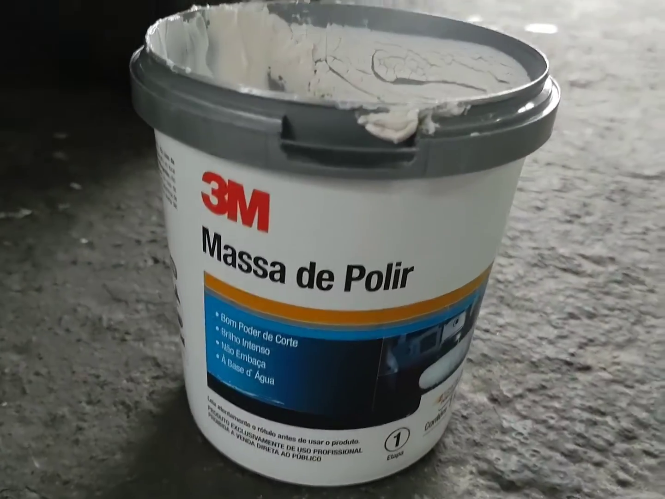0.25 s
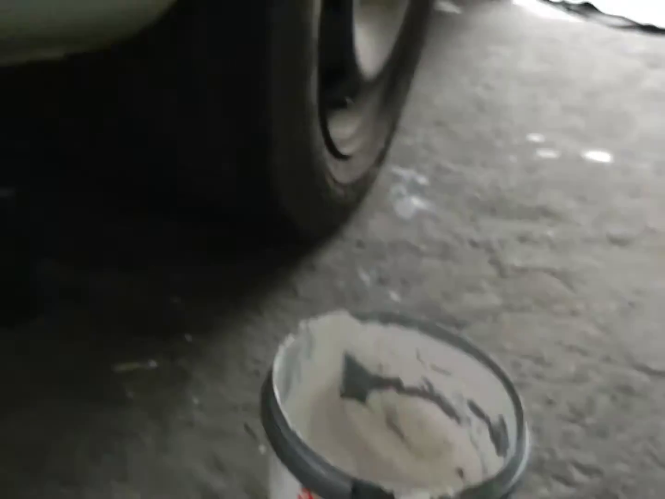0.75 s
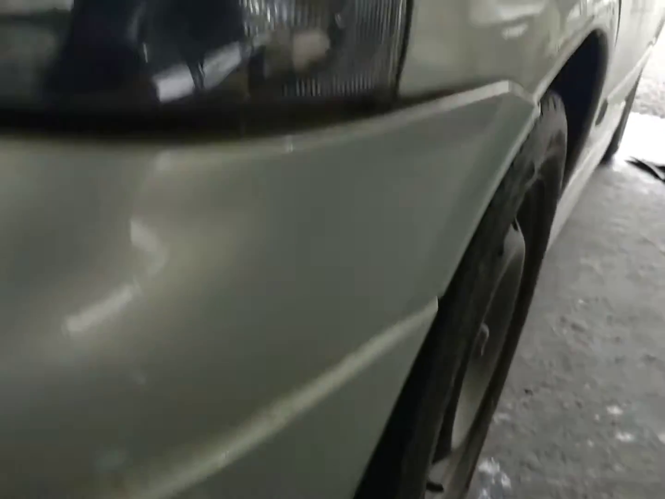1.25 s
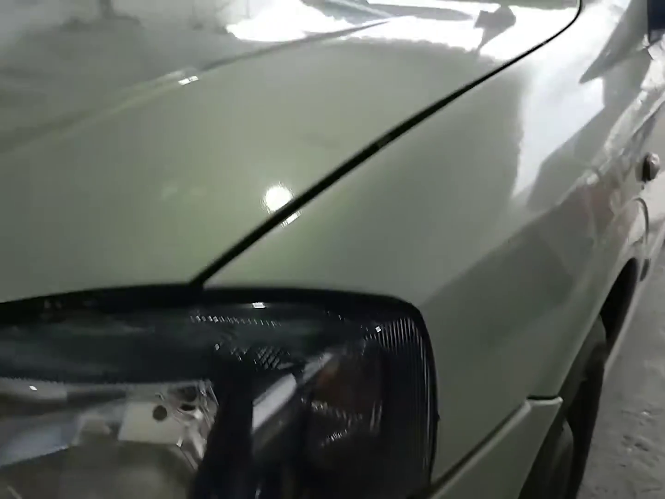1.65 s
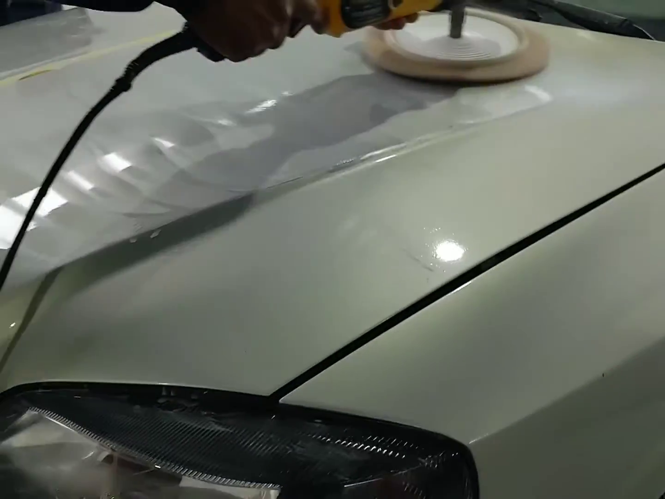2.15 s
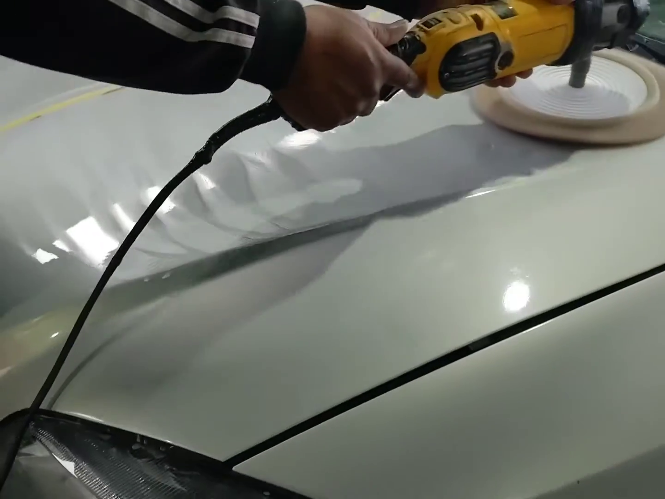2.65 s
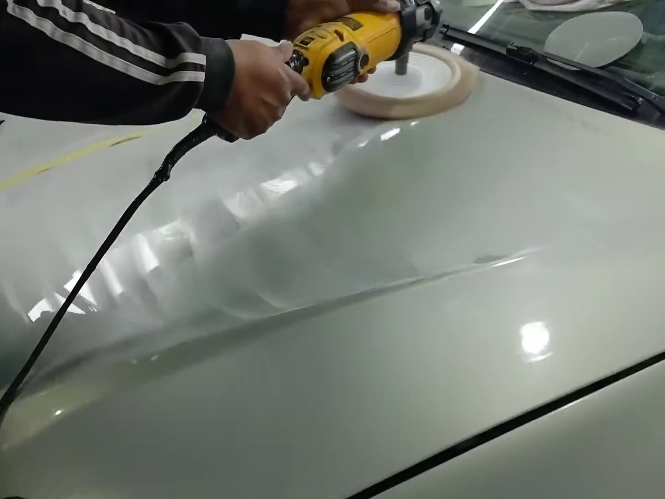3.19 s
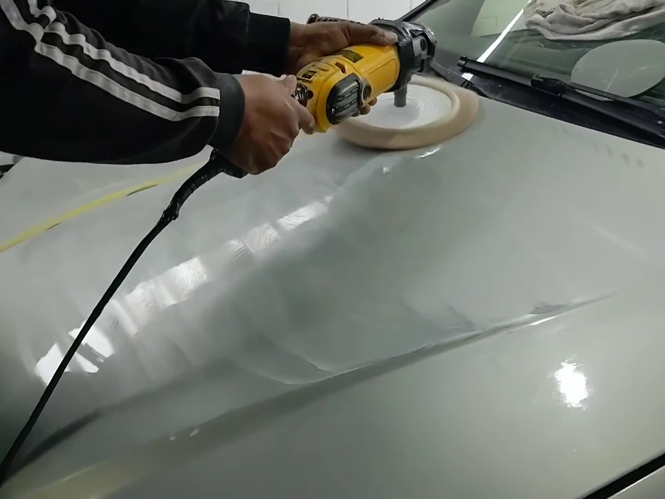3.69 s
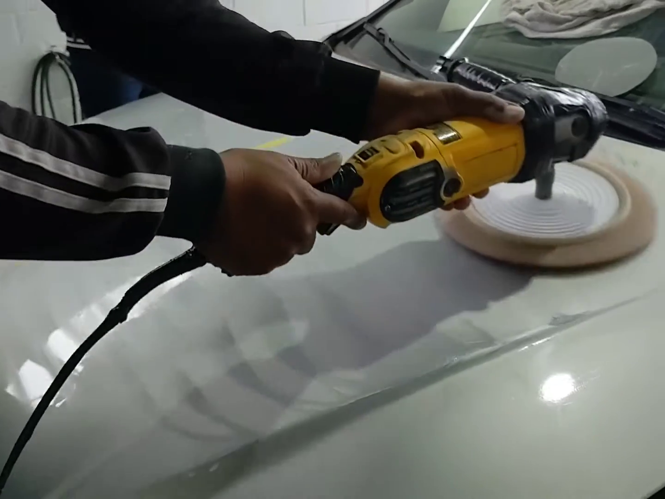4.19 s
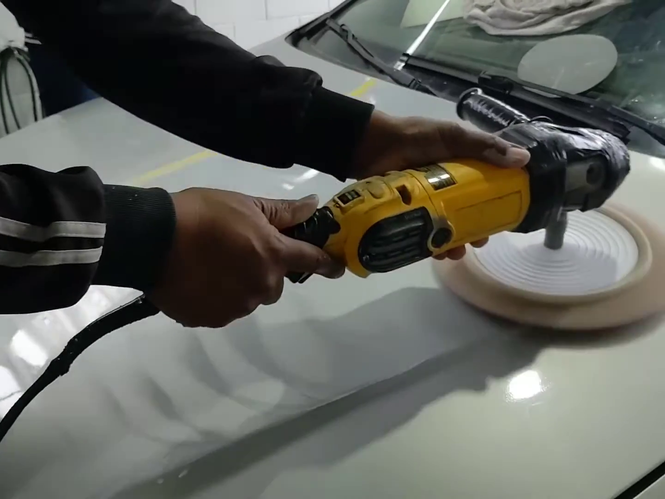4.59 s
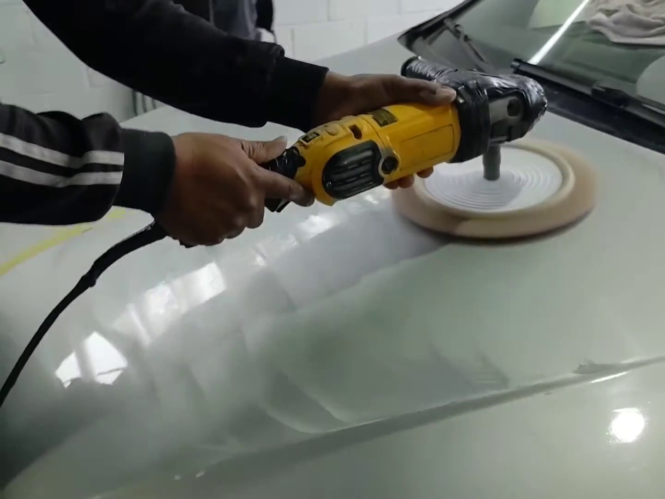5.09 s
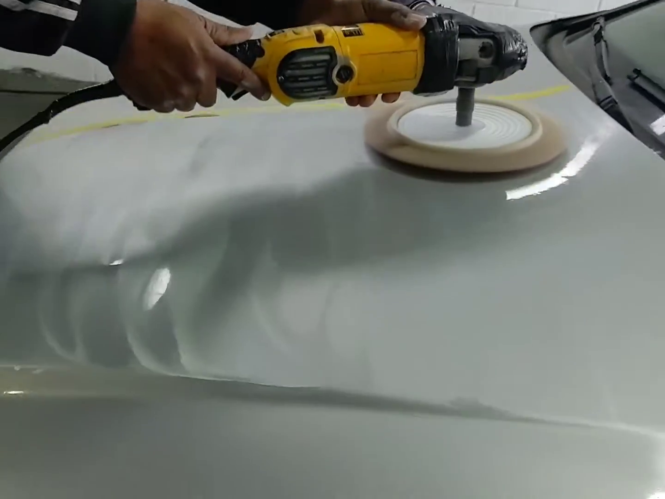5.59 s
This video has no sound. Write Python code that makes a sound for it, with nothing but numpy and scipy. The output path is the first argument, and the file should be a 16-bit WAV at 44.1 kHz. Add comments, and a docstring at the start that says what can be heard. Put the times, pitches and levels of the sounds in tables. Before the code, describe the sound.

Continuous high motor whine of a rotary buffer on a car bonnet, growing from dull to sharp and near over low workshop hum.

```python
"""Rotary polisher on a car bonnet

An electric polisher buffs a bonnet in a garage; a phone is carried round the wing and up to the tool.
The armature turns about 260 times a second: its harmonics sing from gears, commutator and cooling fan.
Gear chatter repeats with every pad turn, air hisses from the vents, the pad rubs the paint and makes the
bonnet growl; a low tone rings, later one soft thud falls, over a low workshop hum."""
import sys
import numpy as np
from scipy import signal
from scipy.fft import rfft, irfft, next_fast_len
from scipy.io import wavfile
from scipy.ndimage import uniform_filter1d

SR = 44100
rng = np.random.default_rng(int(sys.argv[2]) if len(sys.argv) > 2 else 0)


def file_out(sig):
    """Save sig as 16-bit WAV at sys.argv[1]."""
    # one column per channel
    cols = np.atleast_2d(sig).T
    # limit, then scale
    lim = np.clip(cols, -1, 1)
    pcm = np.round(lim * 32767).astype(np.int16)
    wavfile.write(sys.argv[1], SR, pcm)


N = 257347
T = np.arange(N) / SR
BINS_HZ = np.fft.rfftfreq(N, 1 / SR) + 1e-3  # offset keeps the logarithm finite

# mean armature speed, drifting up and down: t/s, f/Hz
SPEED = [(0.0, 257.8), (0.08, 256.8), (0.41, 258.7), (0.52, 263.2), (0.76, 258.2), (0.88, 259.8),
         (1.1, 261.8), (1.4, 254.7), (1.74, 255.3), (1.87, 258.9), (2.01, 260.8), (2.39, 259.1),
         (2.71, 258.2), (2.89, 254.9), (3.23, 257.3), (3.7, 262.2), (3.8, 264.3), (4.24, 267.8),
         (4.49, 261.8), (4.68, 264.7), (4.88, 256.8), (5.3, 257.7), (5.59, 252.7), (5.72, 253.4),
         (5.84, 256.3)]
# gear mesh tone, before trim: t/s, level/dB
GEAR_MESH = [(0.0, -39.5), (0.42, -50), (0.47, -34), (1.15, -44), (1.23, -34), (1.33, -49), (1.93, -29),
             (2.53, -21), (2.65, -32), (3.22, -21), (3.61, -30.5), (3.85, -27), (3.93, -37), (4.13, -26),
             (4.19, -33.5), (5.2, -28.5), (5.35, -37), (5.84, -27)]
# fan whine, the leading voice, before trim: t/s, level/dB, left minus right/dB
FAN = [(0.0, -27, 9.0), (0.05, -29.5, 6), (1.02, -29, 6.5), (1.12, -29.5, 4), (1.61, -16.5, 4.5),
       (2.05, -31, 9), (2.08, -25.5, 19), (2.36, -23.5, 9.5), (2.39, -17.5, 9.5), (3.02, -25, 9.5),
       (3.3, -19.5, 13), (3.41, -24.5, 6.5), (4.14, -26.5, 6.5), (4.68, -15.5, 4.5), (4.88, -23, 2.5),
       (5.61, -21, 1), (5.74, -20.5, 11), (5.84, -22, 2)]
# whine just below the gear mesh, before trim: t/s, level/dB
LOW_WHINE = [(0.0, -58), (1.71, -45.5), (2.24, -31), (2.68, -37), (4.09, -22.5), (5.69, -50.5), (5.84, -48)]
# thin whistle above the fan, before trim: t/s, level/dB
WHISTLE = [(0.0, -40), (1.92, -33.5), (2.1, -23.5), (2.32, -32), (2.76, -21), (3.69, -35), (4.13, -25),
           (4.94, -29.5), (5.04, -22.5), (5.32, -20), (5.36, -25.5), (5.84, -18.5)]
# armature harmonics, relative within a run: multiple of speed, level behind tool/dB, level beside it/dB
HARMONICS = [(6, -34, -28), (7, -26, -15), (8, -33, -19.5), (9, -47, -12), (10, -26, -40), (11, -44.5, -13),
             (12, -37.5, -12), (13, -34, -15.5), (14, -42, -25.5), (15, -33.5, -42), (16, -27, -29.5),
             (17, -22.5, -22.5), (18, -32.5, -29), (19, -35, -26), (20, -42.5, -37), (22, -39, -40.5),
             (23, -59, -56), (24, -38.5, -24.5), (25, -77, -21), (26, -34, -19), (27, -45, -29),
             (28, -27.5, -20), (29, -81, -40), (30, -51.5, -33), (31, -29, -35), (32, -50, -37.5),
             (33, -46, -21), (34, -37, -67), (35, -41, -34), (36, -33.5, -25.5), (37, -35, -31),
             (38, -45, -55), (40, -46, -30.5), (42, -32, -35.5), (43, -67, -66), (44, -57, -56),
             (45, -64, -66), (46, -44, -35), (47, -59, -54), (48, -74, -51)]
# peaks and dips of the motor housing: f/Hz, width/Hz, gain/dB
HOUSING = [(2330, 50, 4), (3190, 55, 10), (4520, 60, -5), (4840, 35, -5), (5020, 60, 5), (5320, 100, -10)]
# gear case resonances: f/Hz, width/Hz, relative level/dB
GEAR_CASE = [(1677, 39, -4.5), (1811, 15, -15.5), (2151, 19, 7), (2426, 193, 0.5), (3050, 240, -1.5)]
# main air vents: f/Hz, width/Hz, relative level/dB
VENTS = [(1770, 450, 1.5), (2620, 520, -5), (3270, 490, -1.5), (4405, 860, -.5), (5310, 340, -17)]
# higher-pitched air slots: f/Hz, width/Hz, relative level/dB
SLOTS = [(5550, 400, -15), (6290, 600, -4), (7200, 660, -5), (8190, 350, -2.5), (9380, 160, -2.5)]
# spectrum of the finest hiss: f/Hz, relative density/(dB per Hz)
SPRAY = [(7000, 8), (9400, -11), (10400, 8), (11300, 0), (11900, 7), (13000, -10), (14200, -2.5),
         (15100, 3), (16000, -4)]
# spectrum of the pad's rub: f/Hz, relative density/(dB per Hz)
PAD_RUB = [(150, -47), (350, -2), (500, -1.5), (620, -0.5), (760, 2), (900, -0.5), (1050, -13),
           (1400, -31.5), (3500, -17)]
# pad pressure as bonnet growl, before trim: t/s, level/dB
PRESSURE = [(0.0, -40.5), (1.15, -43), (1.64, -34.5), (3.01, -33.5), (3.49, -29), (3.93, -28.5),
            (4.26, -41), (5.48, -42.5), (5.79, -36.5), (5.84, -43)]
# bonnet resonances: f/Hz, width/Hz, relative level/dB
BONNET = [(920, 65, 0.5), (945, 370, 0), (1087, 230, 4.5), (1230, 53, 2)]
# a low ringing tone, then three partials of one soft thud: t/s, initial decay level/dB, f/Hz, t60/s
RING_AND_THUD = [(1.213, -32, 220.5, 0.81), (3.393, -29, 90, 0.14), (3.398, -22, 170, 0.073),
                 (3.4, -31, 306, 0.2)]
# spectrum of the workshop rumble: f/Hz, relative density/(dB per Hz)
RUMBLE = [(28, -29), (45, -20), (65, -8.5), (90, -7), (125, -5.5), (160, 0.5), (200, -5), (245, -1.5),
          (300, -10.5), (375, -5.5), (470, -13)]
# swells of the low hum: t/s, 1/e half length/s, mains hum rise/dB, imbalance rise/dB
HUM_SWELLS = [(0.268, 0.19, 11, 14), (0.69, .16, 8, 6.5), (5.546, .22, 9, 3)]
# phone path: t/s, distance/m, side (0 behind tool, 1 beside), shadow (0 open, 1 deep behind car)
PHONE_PATH = [(0, 3.7, 0.22, 1), (1.15, 2.5, 0, 0.82), (1.45, 1.44, 0.43, 0.28), (1.95, 0.88, 0.37, 0.42),
              (2.4, 1.08, 0.19, 0.09), (2.8, 0.88, 0.36, 0.092), (3.3, 1.13, 0.017, 0),
              (3.82, .95, 0.21, 0.12), (4.06, 0.55, 0.88, 0.11), (4.6, 0.64, .95, 0.034),
              (5.05, 0.73, 1, 0.023), (5.84, 0.6, 0.84, 0.15)]
# output by part: behind at 1 m/dB, beside at 1 m/dB, via room/dB, direct loss in car's shadow/dB,
# left minus right/dB from behind, from beside, from room
RADIATION = {"case": (-47, -23, -37.5, 19, 23, -9.5, -13),
             "commutator": (-27, -22.5, -36.5, 2, -1.5, -7.5, 3),
             "brushes": (-26.5, -32, -49.5, 34, -0.5, 1.5, 18),
             "rattle": (-34, -24.5, -49.5, -3.5, -6.5, -10.5, 3),
             "vents": (-23, -29.5, -33.5, 13, -1, -2, 3), "slots": (-34.5, -36, -36, 10.5, 10, 26, -3),
             "spray": (-32, -33.5, -47.5, 23, 2, 6, 2.5), "rub": (-34, -42.5, -45, 9, -1, 0.5, 1)}

GEAR_RATIO = 62 / 7  # armature turns per pad turn
FREE_HZ, LOAD_SAG_HZ = 269.9, 15.6  # speed without load; sag at full load
RIPPLE_HZ = 120  # mains pulsation
SHADE_DB_PER_OCT = 25  # treble slope deep behind the car
OPEN_ECHO, HIDDEN_ECHO = 0.18, 1  # reflected share of the harmonics, tool in sight and hidden
RUMBLE_DB, HUM_DB, IMBALANCE_DB = -41, -46.5, -50.5  # before swells and drift
TOP_HZ = 15900


def motor(turns):
    """Harmonics grouped by pinion (7 teeth), commutator (12 bars), fan blades and neighbouring whines."""
    low = sing(turns, 6, 6, flutter_hz=20, wobble=0.28, ripple=0)
    mesh = sing(turns, 7, 7, flutter_hz=12, wobble=0.2, ripple=0)
    case = sing(turns, 8, 10, flutter_hz=16, wobble=0.39, ripple=0)
    bars = sing(turns, 11, 14, flutter_hz=14, wobble=0.13, ripple=0.8)
    blades = sing(turns, 15, 21, flutter_hz=30, wobble=0.11, ripple=0)
    whistle = sing(turns, 22, 33, flutter_hz=24, wobble=0.17, ripple=0.5)
    brushes = sing(turns, 34, 48, flutter_hz=32, wobble=0.22, ripple=1.5)
    fan_db, fan_pan_db = curves(FAN)
    tones = place(low, curves(LOW_WHINE)[0] + 0.85, pan_db=-0.5)
    tones += place(mesh, curves(GEAR_MESH)[0] + 3.4, pan_db=-2.1)
    tones += place(blades, fan_db + 3.5, fan_pan_db + 0.2)
    tones += place(whistle, curves(WHISTLE)[0] + 1.47, pan_db=4)
    return tones + heard(case, "case") + heard(bars, "commutator") + heard(brushes, "brushes")


def sing(turns, first, last, flutter_hz, wobble, ripple):
    """A run of armature harmonics, each reaching the ears directly and by shifting reflections."""
    beside, reflected, shade_db = outlook()
    direct, echo = np.sqrt(1 - reflected), np.sqrt(reflected / 2)
    speed_hz = curves(SPEED)[0]
    load = np.clip((FREE_HZ - speed_hz) / LOAD_SAG_HZ, 0, 2)
    out = np.zeros((2, N))
    for k, behind_db, beside_db in HARMONICS:
        if not first <= k <= last:
            continue
        angle = 2 * np.pi * ((k * turns + rng.random()) % 1)
        level_db = behind_db + beside * (beside_db - behind_db)
        size = undb(level_db - shade_db * max(np.log2(k / 26), 0))
        size = size * housing(k * speed_hz)
        size = size * (1 + wobble * per_turn(turns / GEAR_RATIO, count=5))  # uneven wheel teeth
        if k % 12 == 0:
            # brush current pulses with the mains, more under load
            size = size * (1 + ripple * load * np.cos(2 * np.pi * RIPPLE_HZ * T))
        sine, cosine = size * np.sin(angle), size * np.cos(angle)
        lag_rad = 1.07 * walk(1.177)  # drifting phase between the ears
        together, apart = direct * np.cos(lag_rad), direct * np.sin(lag_rad)
        for ear, side in enumerate((1, -1)):
            out[ear] += sine * (together + echo * walk(flutter_hz))
            out[ear] += cosine * (side * apart + echo * walk(flutter_hz))
    # harmonics trade strength while the run's short-term level stays even
    return out / np.sqrt(uniform_filter1d(out ** 2, size=5000, axis=1))


def housing(hz):
    """Housing gain at a tone's pitch; harmonics slide through its peaks and dips with speed."""
    return undb(sum(db * np.exp(-((hz - centre) / width) ** 2) for centre, width, db in HOUSING))


def rattle(turns):
    """Wheel teeth chatter in the resonant gear case: a pattern repeated each pad turn, plus noise."""
    teeth = np.array([per_turn(turns / GEAR_RATIO, count=600) for ear in range(2)])
    loose = noise(0.14) * (1 + 0.087 * np.cos(2 * np.pi * turns))
    chatter = teeth + 1.1 * loose
    return heard(shape(chatter, resonances(GEAR_CASE)), "rattle")


def air(turns):
    """Cooling air, chopped by the fan, hisses through vents and slots, with a finer spray of hiss."""
    chop = 1 + 0.29 * np.cos(2 * np.pi * turns) + 0.36 * np.cos(4 * np.pi * turns)
    spray = shape(noise(0) * chop, colour(SPRAY))
    return (heard(blow(VENTS, chop), "vents") + heard(blow(SLOTS, chop), "slots")
            + heard(spray, "spray"))


def blow(openings, chop):
    """Resonant bands of chopped noise, each flickering on its own and shaded above 6 kHz."""
    shade_db = outlook()[2]
    out = 0
    for hz, width_hz, db in openings:
        flicker_db = 1.5 * walk(20.63) - shade_db * max(np.log2(hz / 6000), 0)
        band = shape(noise(0.055) * chop, resonances([(hz, width_hz, 0)]))
        out = out + band * np.sqrt(width_hz) * undb(db + flicker_db)
    return unit(out)


def pad(turns):
    """The pad drags over the paint, gripping unevenly round its rim; pressed, it makes the bonnet growl."""
    growl_db = curves(PRESSURE)[0]
    pressure = undb(growl_db - growl_db.max())
    grip = undb(1.6 * per_turn(turns / GEAR_RATIO, count=7))
    scuffs = per_turn(turns / GEAR_RATIO, count=400)  # same tufts catch on every turn
    rub = shape(noise(1.0) * grip + 0.22 * scuffs, colour(PAD_RUB))
    drive = noise(0.17) * grip * np.sqrt(1 - pressure / 2) + pressure ** 2 * scuffs / 2
    growl = shape(drive, resonances(BONNET))
    shake = pressure * grip * np.sin(2 * np.pi * 4 * turns)  # fourth armature harmonic in the bonnet
    return heard(rub, "rub") + (growl + 0.71 * shake) * undb(growl_db - 2.5)


def ring_and_thud():
    """A low 220 Hz ringing tone, then one soft thud of three partials: decaying sines, 1.3 ms attack."""
    out = np.zeros(N)
    for s, db, hz, t60_s in RING_AND_THUD:
        age_s = np.maximum(T - s, 0)
        envelope = undb(db - 60 * age_s / t60_s) * (1 - np.exp(-age_s / 0.0013))
        out += envelope * np.sin(2 * np.pi * hz * age_s)
    return out


def drone(turns):
    """Workshop rumble as coloured noise, with swelling mains hum and armature imbalance."""
    hum_db, shaft_db = HUM_DB, IMBALANCE_DB
    for s, half_length_s, hum_rise_db, shaft_rise_db in HUM_SWELLS:
        swell = np.exp(-((T - s) / half_length_s) ** 2)
        hum_db = hum_db + hum_rise_db * swell
        shaft_db = shaft_db + shaft_rise_db * swell
    hum = undb(hum_db + 2.8 * walk(9)) * np.sin(2 * np.pi * RIPPLE_HZ * T + 0.5 * walk(5.0))
    shaft = undb(shaft_db) * np.sin(2 * np.pi * turns + 0.29 * walk(4.6))
    rumble = shape(noise(1.0), colour(RUMBLE)) * undb(RUMBLE_DB)
    return rumble + hum + shaft


def outlook():
    """Side heard (the room blends both when hidden), reflected share, treble shade in dB per octave."""
    _, beside, hidden = curves(PHONE_PATH)
    beside, hidden = np.clip([beside, hidden], 0, 1)
    reflected = np.clip(OPEN_ECHO + (HIDDEN_ECHO - OPEN_ECHO) * hidden ** 2, 0, 1)
    return beside + hidden ** 2 * (0.5 - beside), reflected, SHADE_DB_PER_OCT * hidden


def heard(x, part):
    """Direct level follows side, distance and the car's shadow; the room's share stays constant."""
    behind_db, beside_db, room_db, shadow_db, behind_pan_db, beside_pan_db, room_pan_db = RADIATION[part]
    metres, beside, hidden = curves(PHONE_PATH)
    direct = undb(behind_db + beside * (beside_db - behind_db) - hidden * shadow_db) / metres
    power = direct ** 2 + undb(room_db) ** 2
    direct_pan_db = behind_pan_db + beside * (beside_pan_db - behind_pan_db)
    pan_db = room_pan_db + direct ** 2 / power * (direct_pan_db - room_pan_db)
    return place(x, 10 * np.log10(power), pan_db)


def place(x, db, pan_db):
    """Set level and left-minus-right balance at constant total power."""
    sides = undb(np.array([[1], [-1]]) * pan_db / 2)
    return x * undb(db) * sides / np.sqrt(np.mean(sides ** 2, axis=0))


def per_turn(turns, count):
    """Random profile of `count` points that recurs with every turn."""
    return unit(np.interp(turns % 1, np.arange(count) / count, rng.standard_normal(count), period=1))


def walk(rate_hz):
    """Smooth random drift with a new value at `rate_hz`; spread near 1."""
    steps = signal.resample_poly(rng.standard_normal(1024), up=8, down=1)
    return np.interp(T * rate_hz, np.arange(len(steps)) / 8 - 8, steps)


def noise(likeness):
    """White noise for two ears with the given correlation, capped at 0.9."""
    mid, side = rng.standard_normal((2, N))
    c = np.clip(likeness, 0, 0.9)
    return unit(np.sqrt(1 + c) * mid + np.sqrt(1 - c) * side * np.array([[1], [-1]]))


def colour(points):
    """Spectral gain through (Hz, dB) points, falling 12 dB per octave beyond the ends."""
    hz, db = np.transpose(points)
    beyond = np.minimum(BINS_HZ / hz[0], 1) * np.minimum(hz[-1] / BINS_HZ, 1)
    return undb(np.interp(np.log(BINS_HZ), np.log(hz), db)) * beyond ** 2


def resonances(modes):
    """Spectral gain of resonant peaks, summed in power."""
    power = 0
    for hz, width_hz, db in modes:
        peak = undb(db) / (1 + ((BINS_HZ - hz) / width_hz) ** 2 * 2)
        power = power + peak ** 2
    return np.sqrt(power)


def shape(x, gain):
    """Filter by a spectral gain and bring to rms 1."""
    size = next_fast_len(N)
    gain = np.interp(np.fft.rfftfreq(size, 1 / SR), BINS_HZ, gain)
    return unit(irfft(rfft(x, size) * gain, size)[..., :N])


def curves(table):
    """Table columns joined by straight lines in time."""
    s, *columns = np.transpose(table)
    return [np.interp(T, s, c) for c in columns]


def undb(db):
    """Decibels to amplitude gain."""
    return 10 ** (np.asarray(db) / 20)


def unit(x):
    """Scale to rms 1."""
    return x / np.sqrt(np.mean(x ** 2))


def scene():
    """One shaft times all the tool's parts; its speed tremble blurs the highest harmonics most."""
    tremble_hz = 0.28 * walk(140)
    turns = np.cumsum(curves(SPEED)[0] + tremble_hz) / SR
    return motor(turns) + rattle(turns) + air(turns) + pad(turns) + ring_and_thud() + drone(turns)


def record(dry):
    """Rounds the very highest peaks smoothly, then low-passes at TOP_HZ."""
    rounded = dry / (1 + (dry / 0.92) ** 8) ** (1 / 8)
    return signal.sosfilt(signal.ellip(12, 0.1, 90, TOP_HZ, fs=SR, output="sos"), rounded)


dry = scene()
out = record(dry)
file_out(out)
```